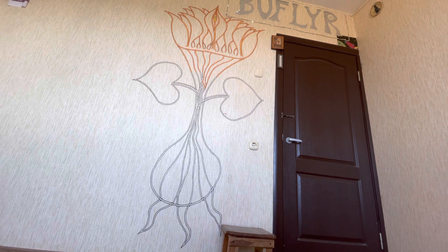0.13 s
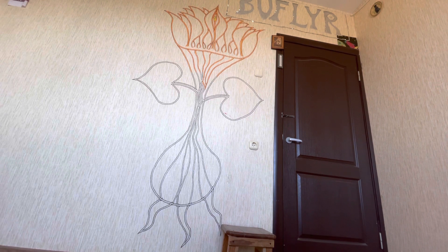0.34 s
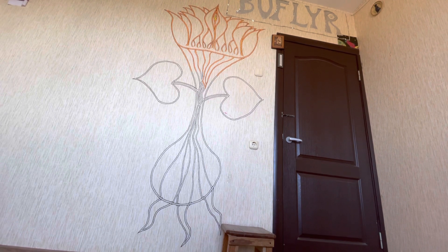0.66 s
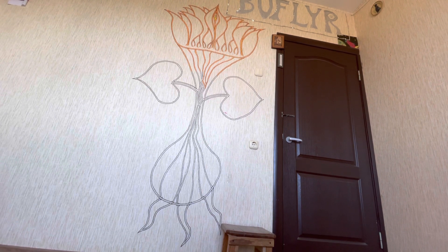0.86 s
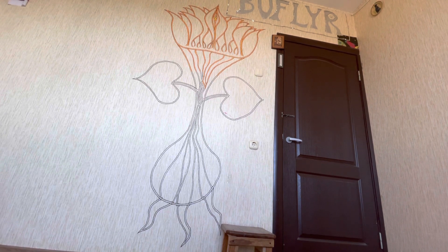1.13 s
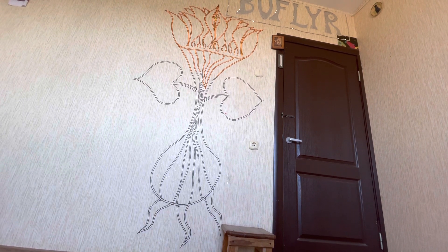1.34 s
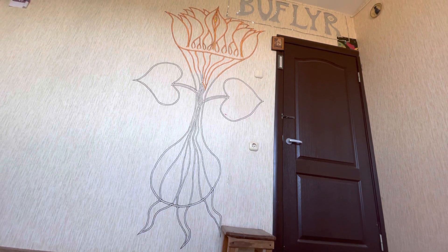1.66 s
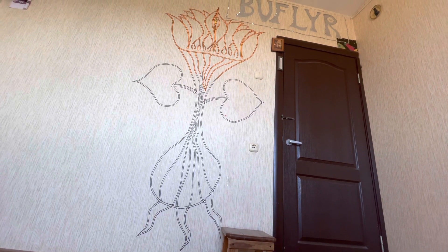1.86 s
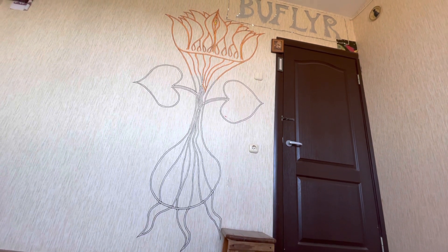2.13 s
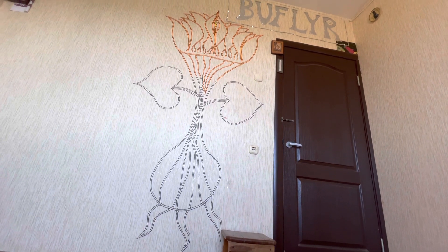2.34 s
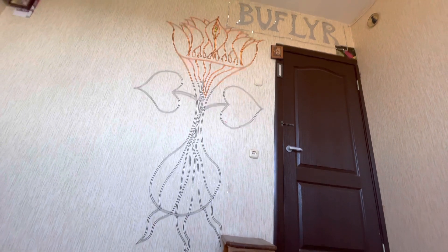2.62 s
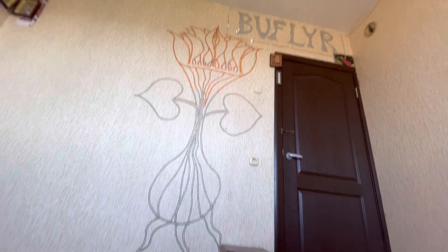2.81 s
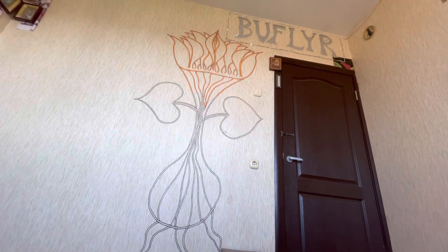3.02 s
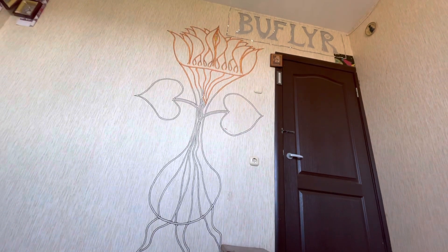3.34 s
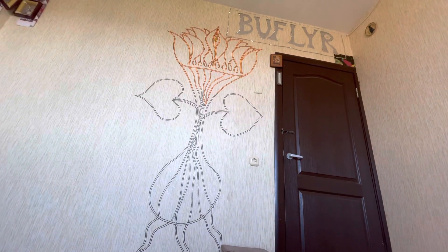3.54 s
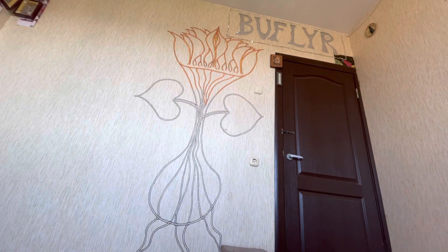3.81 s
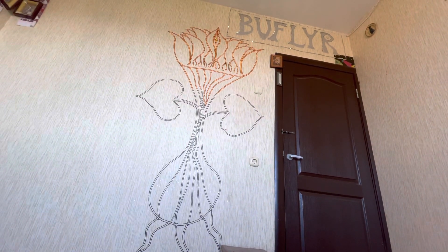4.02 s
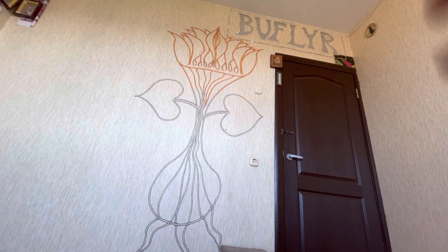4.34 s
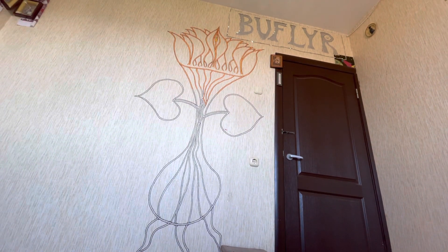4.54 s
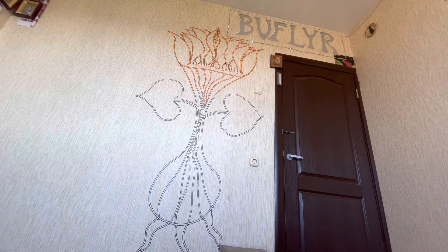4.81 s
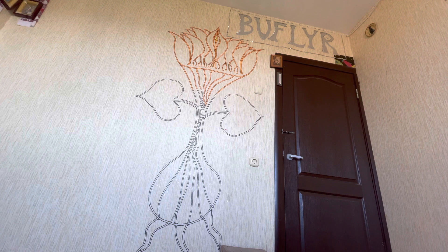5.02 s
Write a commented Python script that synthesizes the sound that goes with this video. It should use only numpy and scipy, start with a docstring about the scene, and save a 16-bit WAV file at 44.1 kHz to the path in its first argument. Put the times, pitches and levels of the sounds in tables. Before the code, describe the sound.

Stereo hand-held camera indoors, with birds heard from outside and echoing off near walls. Faint chirps and pipes open, a loud song of buzz, warble and held whistle fills the middle, then sparse distant chirps and a sinking trill follow. Fingers tick, rub and softly bump the case throughout, over a quiet low hiss.

```python
"""A near bird, outside a small room, sings a thin high buzz, a fast warble and a few clear whistles.
Farther birds add falling chirps, rasps, pipes and a descending trill; many distant chirps blur in echo.
Birds are gliding, fluttering tones with wall echoes and a diffuse tail. The hand-held camera ticks,
squeaks, rustles and rumbles as shaped noise and short tones, over a quiet hush of filtered noise."""
import sys
import numpy as np
from scipy import signal
from scipy.fft import rfft, irfft, next_fast_len
from scipy.io import wavfile
from scipy.ndimage import uniform_filter1d, map_coordinates

SR = 44100
rng = np.random.default_rng(int(sys.argv[2]) if len(sys.argv) > 2 else 0)


def unload_wav(signal):
    """Save mono or channel-first audio to the path in sys.argv[1] as 16-bit WAV at rate SR, clipped to [-1, 1]."""
    wavfile.write(
        sys.argv[1],
        SR,
        np.round(np.clip(np.atleast_2d(signal).T, -1, 1) * 32767).astype(np.int16),
    )


N = 227908


def amp(db):
    """Decibels to gain."""
    return 10 ** (np.asarray(db) / 20)


def unit(x):
    """Scale to rms 1."""
    return x / np.sqrt(np.mean(x ** 2) + 1e-20)


def along(points, hz):
    """Interpolate (Hz, value) points on a log frequency axis."""
    point_hz, values = np.transpose(points)
    return np.interp(np.log(hz + 1), np.log(point_hz + 1), values)


def curve(rows):
    """(s, value) rows as one value per sample."""
    return np.interp(np.arange(N) / SR, *np.transpose(rows))


def wobble(rate_hz, size):
    """A smooth random curve, rate_hz knots a second."""
    knots = rng.standard_normal(int(size * rate_hz / SR) + 4)
    return map_coordinates(knots, [np.arange(size) * rate_hz / SR])


def filtered(x, response):
    """x times a complex response of frequency."""
    m = next_fast_len(N + SR // 2)
    return irfft(rfft(x, m) * response(np.fft.rfftfreq(m, 1 / SR)), m)[..., :N]


def coloured(x, points):
    """x through a causal (minimum-phase) filter with these (Hz, dB) points."""
    m = next_fast_len(N + SR // 2)
    cepstrum = irfft(np.log(amp(along(points, np.fft.rfftfreq(m, 1 / SR)))), m)
    cepstrum *= 1 + np.sign(np.fft.fftfreq(m))  # fold onto positive time
    return filtered(x, lambda hz: np.exp(rfft(cepstrum)))


def add(track, start_s, sound):
    """Mix a sound into a track."""
    part = track[..., max(round(start_s * SR), 0):][..., :sound.shape[-1]]
    part += sound[..., :part.shape[-1]]


def noise(spectrum, side_db):
    """Coloured stereo noise of rms 1; side_db is the side's level against the mid."""
    mid, side = filtered(rng.standard_normal((2, N)), lambda hz: amp(along(spectrum, hz)))
    return unit(np.array([mid + amp(side_db) * side, mid - amp(side_db) * side]))


def patchy(x, depth_db):
    """Noise whose colour shifts in small random time-frequency patches."""
    z = signal.stft(x, nperseg=256)[2]
    field = rng.standard_normal(z.shape[1:])
    field = uniform_filter1d(uniform_filter1d(field, size=5, axis=0), size=7, axis=1)
    return unit(signal.istft(z * amp(depth_db * unit(field)), nperseg=256)[1][:, :N])


def arch(length_s, late, edge):
    """Progress 0-1 through a gesture, and its swell and fall."""
    u = np.linspace(0, 1, max(int(length_s * SR), 8))
    return u, np.abs(np.sin(np.pi * u ** late)) ** edge


def sweep(start_hz, end_hz, bow=0):
    """Start, middle and end pitch of a glide whose middle bows by a share."""
    return start_hz, (start_hz + end_hz) / 2 * (1 + bow), end_hz


BUZZ_RATE_HZ = 165  # mean flutter rate
THROB_HZ = 425  # buzz depth at which the level pulses fully with the flutter


def note(length_s, pitches_hz, buzz_hz, waver, late, edge, uneven=0.45, overtone_db=-50):
    """The syrinx glides through a few pitches; uneven membrane flutter makes the note buzz and throb."""
    u, swell = arch(length_s, late, edge)
    count = len(pitches_hz)
    glide_hz = np.polyval(np.polyfit(np.linspace(0, 1, count), pitches_hz, count - 1), u)
    cycle = 2 * np.pi * np.cumsum(BUZZ_RATE_HZ * (1 + .2 * wobble(90, len(u)))) / SR
    pitch_hz = glide_hz * (1 + waver * wobble(220, len(u)))
    pitch_hz = pitch_hz + buzz_hz * (np.sin(cycle) + uneven * wobble(700, len(u)))
    throb = np.clip(buzz_hz / THROB_HZ, 0, 1)
    phase = 2 * np.pi * np.cumsum(pitch_hz) / SR
    tone = np.sin(phase) + amp(overtone_db) * np.sin(2 * phase)
    return swell * (1 - throb * np.cos(cycle)) * tone


# diffuse tail decay: freq_hz, t60_s
ROOM_DECAY = [(300, 0.53), (3500, 0.43), (8000, 0.31)]


def room(x, early_db, tail_db, early_t60, apart=0.89):
    """Sparse echoes of close walls and a diffuse tail, both from 3 ms on; apart is the stereo difference."""
    hz, t, z = signal.stft(rng.standard_normal((2, SR // 2)), SR, nperseg=256)
    fade = amp(-60 * t / along(ROOM_DECAY, hz)[:, None])
    tail = signal.istft(z * fade, SR, nperseg=256)[1]
    t = np.arange(tail.shape[1]) / SR
    sparse = rng.standard_normal(tail.shape) * (rng.random(tail.shape) < .02)
    early = sparse * amp(-60 * t / early_t60)
    parts = np.array([[1, apart], [1, -apart]]) @ np.array([early, tail]) * (t > .003)
    early, tail = parts / np.linalg.norm(parts, axis=-1, keepdims=True)
    return signal.fftconvolve(x[None], amp(early_db) * early + amp(tail_db) * tail, axes=1)[:, :N]


# near-wall echoes: delay_s, level_db
WALL_ECHOES = [(.0042, -10.5), (.0063, -15), (.0115, -11), (.0172, -12.5), (.0255, -15), (.04, -17)]


def walls(song):
    """Each near wall repeats the song."""
    echoes = np.zeros(N)
    for delay_s, level_db in WALL_ECHOES:
        add(echoes, delay_s, amp(level_db) * song)
    return echoes


# phase between two microphone ports for outside sound: freq_hz, left_lead_rad
PORT_PHASE = [(0, 1.5), (600, -3.5), (1290, -1), (1640, -2), (2330, -4.5), (2670, -5), (3450, -8),
              (4390, -7.5), (4820, -10), (6290, -15), (7060, -12), (7750, -14.5), (8180, -13.5),
              (9470, -21)]


def from_outside(x):
    """The song and its echo reach the two ports out of step."""
    return filtered(x, lambda hz: np.exp(1j * along(PORT_PHASE, hz) * np.array([[.5], [-.5]])))


HAND_LAG_S = 0.000275


def from_hand(x):
    """Sounds of the hand on the case reach the left microphone later."""
    return filtered(x, lambda hz: np.exp(-2j * np.pi * hz * HAND_LAG_S * np.array([[.5], [-.5]])))


# hush spectrum: freq_hz, relative_db
AIR_SPECTRUM = [(30, -11), (90, -5), (160, -8), (230, -6.5), (400, -12), (800, -18), (1350, -18),
                (1800, -24.5), (3500, -28), (5000, -28.5), (9200, -28), (10500, -40), (15000, -51)]
AIR_DB = -74


def background():
    """The steady hush of the room: filtered noise."""
    return amp(AIR_DB) * noise(AIR_SPECTRUM, side_db=1.5)


# slow hand slides: start_s, length_s, drag_db, body_db, bright_db
SLIDES = [(0, 0.24, -105, -94, -65), (0.509, 0.64, -70.5, -66, -68.5), (4.087, 0.416, -78, -83, -100)]
# drag, hiss and (shared with rubs) bright friction spectra: freq_hz, relative_db
DRAG_SPECTRUM = [(40, -36), (170, -21), (290, 0.5), (430, 3), (560, -12.5), (850, -21), (1200, -31),
                 (3000, -83)]
HISS_SPECTRUM = [(600, -23), (1050, -4), (1350, 9.5), (1680, -5), (2050, 8), (2600, -9.5), (4000, -23.5),
                 (9000, -42), (10500, -74)]
BRIGHT_SPECTRUM = [(900, -22.5), (1400, -4), (2200, 9.5), (3500, 0), (4800, 10), (5500, 4.5), (6200, 8),
                   (7600, -11.5), (9000, 5.5), (10000, -10.5), (10800, -30), (14500, -21)]
PATCHY_DB = 3.5  # unevenness of shifting colour


def slides(grain_db=3.0, lump_db=3.0):
    """The hand slides over the case: a grainy hiss swells and fades over a low, lumpy drag."""
    low, body, bright = np.zeros((3, N))
    for start_s, length_s, drag_db, body_db, bright_db in SLIDES:
        speed = arch(length_s, late=0.82, edge=1.0)[1]
        add(low, start_s, amp(drag_db) * speed ** 0.23)
        add(body, start_s, amp(body_db) * speed)
        add(bright, start_s, amp(bright_db) * speed)
    drag = low * amp(lump_db * wobble(30.06, N)) * noise(DRAG_SPECTRUM, side_db=-0.5)
    hiss = body * noise(HISS_SPECTRUM, side_db=-7)
    hiss = hiss + bright * patchy(noise(BRIGHT_SPECTRUM, side_db=-6), PATCHY_DB)
    return from_hand(drag + amp(grain_db * wobble(200, N)) * hiss)


# rustles, as of fingers and sleeve on the case: start_s, length_s, dull_db, bright_db
RUBS = [(1.508, 0.069, -65.5, -75), (1.743, 0.11, -70, -69), (1.872, 0.14, -63, -65),
        (2.602, 0.23, -75.5, -79), (2.757, 0.075, -67.5, -70.5), (2.888, 0.054, -70, -80),
        (3.685, 0.1, -65, -67.5), (4.921, 0.22, -85, -73.5)]
# dull rub spectrum: freq_hz, relative_db
DULL_SPECTRUM = [(70, -29), (130, -7), (220, -0.5), (380, 0.5), (700, -6.5), (1300, -1), (2400, -21.5),
                 (4000, -57)]
# handling rumble: time_s, level_db
RUMBLE_LEVEL = [(0.0, -70.5), (0.47, -74.5), (1.89, -64), (2.81, -68.5), (3.09, -64), (3.48, -72.5),
                (3.99, -71), (4.23, -79), (5.17, -75.5)]
# rumble spectrum: freq_hz, relative_db
RUMBLE_SPECTRUM = [(22, -29), (45, 2.5), (90, 2.5), (110, 4), (135, -9.5), (165, 0.5), (205, -31.5),
                   (400, -51.5)]
# soft knocks through the hand: start_s, pitch_hz, level_db (before attack and channel gains)
BUMPS = [(0.659, 70.2, -50), (2.922, 88.4, -44.5)]


def handling(grain_db=2.5, lump_db=3, bump_t60=0.29):
    """The holding hand: grainy friction noise, lumpy low rumble and soft decaying sine bumps."""
    dull, bright, bumps = np.zeros((3, N))
    for start_s, length_s, dull_db, bright_db in RUBS:
        stroke = arch(length_s, late=1.0, edge=0.44)[1]
        add(dull, start_s, amp(dull_db) * stroke)
        add(bright, start_s, amp(bright_db) * stroke)
    grain = amp(grain_db * wobble(250, N))
    dull_rubs = dull * patchy(noise(DULL_SPECTRUM, side_db=2), PATCHY_DB)
    bright_rubs = bright * patchy(noise(BRIGHT_SPECTRUM, side_db=-5.5), PATCHY_DB)
    rubs = grain * (dull_rubs + bright_rubs)
    t = np.arange(SR // 2) / SR
    for start_s, pitch_hz, level_db in BUMPS:
        decay = amp(level_db - 60 * t / bump_t60) * (1 - np.exp(-t / 0.0031))
        add(bumps, start_s, decay * np.sin(2 * np.pi * pitch_hz * t))
    lumps = unit(amp(lump_db * wobble(18, N)) * noise(RUMBLE_SPECTRUM, side_db=-6))
    rumble = amp(curve(RUMBLE_LEVEL)) * lumps * amp([[1.5], [-1.5]])
    return from_hand(rubs) + rumble + bumps * amp([[3], [-6]]) * [[1], [-1]]  # bumps: opposite polarity


# distant birds' level: time_s, level_db
CHORUS_LEVEL = [(0, -58), (.3, -67.5), (.68, -68.5), (.88, -57.5), (1.2, -81), (2.7, -73.5), (4.3, -94),
                (5.17, -77.5)]


def chorus(count=300, pitch_hz=3200, spread=0.15, fall=.08):
    """Many distant birds chirp at random; only their echo is heard."""
    song = np.zeros(N)
    for i, (when, high, slope, long) in enumerate(rng.standard_normal((count, 4))):
        hz = pitch_hz * np.exp(spread * high)
        step = np.exp(fall * (1 + slope) / 2)
        length_s = 0.027 * np.exp(0.35 * long)
        chirp = note(length_s, (hz * step, hz, hz / step), buzz_hz=140, waver=0.015, late=0.067, edge=0.92)
        add(song, (i + when / 2) / count * N / SR, chirp)
    echo = room(song, early_db=-4.0, tail_db=0.5, early_t60=0.19, apart=0.2)
    return amp(curve(CHORUS_LEVEL)) * unit(from_outside(echo))


# far slides and level pipes: start_s, length_s, start_hz, end_hz, level_db
PIPES = [(0.024, 0.023, 2660, 2290, -57.5), (0.099, 0.03, 3490, 2932, -46.5),
         (0.257, 0.11, 2340, 2725, -57), (0.386, 0.09, 3076, 3127, -61), (0.594, 0.055, 3376, 3335, -54),
         (0.711, 0.091, 2995, 3027, -52.5), (0.944, 0.11, 2858, 2680, -54),
         (1.109, 0.071, 2770, 2903, -61.5), (1.524, .04, 4310, 3940, -60.5),
         (2.64, 0.51, 8240, 8270, -78.5), (2.767, 0.05, 2935, 2976, -60), (3.091, 0.02, 2676, 2330, -65),
         (3.739, 0.035, 4592, 4410, -56.5)]
FAR_EDGE = .5  # softness of far notes' ends, also in far_birds


def piping_birds(direct_db=-4):
    """Slides and level pipes from farther still: lightly buzzing tones, mostly echo."""
    song = np.zeros(N)
    for start_s, length_s, start_hz, end_hz, level_db in PIPES:
        pipe = note(length_s, sweep(start_hz, end_hz), buzz_hz=54.6, waver=0.012, late=0.92, edge=FAR_EDGE)
        add(song, start_s, amp(level_db) * pipe)
    echo = room(song, early_db=-0.5, tail_db=-3.0, early_t60=0.16, apart=0.38)
    return from_outside(amp(direct_db) * song + echo)


# falling slurs: start_s, length_s, start_hz, end_hz, level_db
SLURS = [(0.05, 0.038, 3940, 3250, -51.5), (0.552, 0.035, 3650, 3300, -50.5),
         (0.734, 0.059, 3754, 3375, -49), (0.838, 0.029, 5000, 3496, -50.5),
         (0.884, 0.049, 3617, 3177, -51.5), (0.942, 0.021, 4900, 3250, -49),
         (3.298, 0.009, 5140, 3170, -55.5), (3.434, 0.05, 4090, 3377, -57.5),
         (3.78, 0.018, 4100, 3310, -60), (4.008, 0.021, 4560, 3230, -58), (4.232, .022, 4410, 4260, -65),
         (4.249, .03, 4050, 3290, -60), (4.499, .014, 5610, 4470, -63.5), (4.508, 0.025, 3910, 3340, -56.5),
         (4.755, 0.03, 4050, 3300, -59.5), (4.973, 0.025, 3830, 3365, -56.5),
         (4.992, 0.036, 3680, 3130, -57.5)]
SLUR_BOW = 0.0026
# rising calls: start_s, length_s, end_hz, level_db
RISES = [(2.969, 0.029, 3480, -62.5), (3.13, 0.017, 4006, -57.5), (3.145, 0.014, 4864, -64),
         (3.282, .015, 5250, -59)]
RISE_START_HZ, RISE_BOW = 3090, -0.018
# trill that slows, sinks and mostly grows louder: start_s, start_hz, level_db
TRILL = [(3.429, 7750, -65.5), (3.499, 7600, -65), (3.575, 7170, -60), (3.66, 6700, -55),
         (3.752, 6300, -56.5), (3.854, 5650, -54), (3.978, 5790, -53.5)]
TRILL_END_HZ, TRILL_NOTE_S, TRILL_BOW = 4590, .04, 0.045
# high lisps leading into late slurs: start_s, length_s, end_hz, level_db
LISPS = [(3.968, 0.014, 5370, -59), (4.218, 0.015, 4440, -68), (4.469, .019, 5520, -67),
         (4.96, 0.015, 3970, -67)]
LISP_START_HZ, LISP_BOW = 7080, -0.03


def far_notes():
    """Farther birds' calls: start_s, length_s, pitches_hz, level_db."""
    for start_s, length_s, start_hz, end_hz, level_db in SLURS:
        yield start_s, length_s, sweep(start_hz, end_hz, SLUR_BOW), level_db
    for start_s, length_s, end_hz, level_db in RISES:
        yield start_s, length_s, sweep(RISE_START_HZ, end_hz, RISE_BOW), level_db
    for start_s, start_hz, level_db in TRILL:
        yield start_s, TRILL_NOTE_S, sweep(start_hz, TRILL_END_HZ, TRILL_BOW), level_db
    for start_s, length_s, end_hz, level_db in LISPS:
        yield start_s, length_s, sweep(LISP_START_HZ, end_hz, LISP_BOW), level_db


# far rasping notes: start_s, length_s, start_hz, end_hz, level_db
RASPS = [(.135, 0.091, 3130, 2993, -56.5), (.655, 0.066, 3400, 3360, -65),
         (3.984, 0.024, 6330, 5900, -62.5), (4.485, 0.027, 5450, 5670, -63.5),
         (4.49, 0.063, 6150, 5700, -69), (4.54, 0.12, 3546, 3515, -69.5), (4.69, 0.095, 4540, 4290, -72),
         (4.69, 0.033, 3530, 3346, -65)]
RASP_DEPTH_HZ = 171  # flutter depth


def far_birds(walls_db=-2):
    """Gliding, slightly hoarse chirps and rasps, doubled by the walls and smeared by echo."""
    song = np.zeros(N)
    for start_s, length_s, pitches_hz, level_db in far_notes():
        hoarse_hz = 15 + 0.045 * np.ptp(pitches_hz)  # wide sweeps are the hoarsest
        chirp = note(length_s, pitches_hz, hoarse_hz, waver=0.0065, late=1.93, edge=FAR_EDGE, overtone_db=-38)
        add(song, start_s, amp(level_db) * chirp)
    for start_s, length_s, start_hz, end_hz, level_db in RASPS:
        rasp = note(length_s, sweep(start_hz, end_hz), RASP_DEPTH_HZ, waver=.02, late=0.84, edge=FAR_EDGE)
        add(song, start_s, amp(level_db) * rasp)
    echo = room(song, early_db=-2.0, tail_db=-4.5, early_t60=0.14, apart=1.0)
    return from_outside(song + amp(walls_db) * walls(song) + echo)


# sharp clicks of the case: start_s, snap_db, thud_db
CLICKS = [(.149, -51, -80), (.361, -38, -70), (1.035, -44.5, -57.5), (1.3963, -43.5, -63.5),
          (1.5372, -58, -45), (1.6145, -56.5, -47.5), (1.769, -51.5, -60.5), (1.902, -54.5, -59),
          (1.956, -46, -43.5), (3.8835, -48, -91)]
# hand taps that ring the case: start_s, ring_db
TAPS = [(0.335, -46.5), (0.381, -54.5), (0.443, -47.5), (1.031, -50), (1.496, -46), (1.765, -48.5),
        (1.863, -50), (1.9815, -42.5), (2.043, -48.5), (2.62, -52.5), (2.913, -49.5), (4.3991, -58),
        (4.536, -48), (4.9507, -51)]
TAP_THUD_DB, TAP_SNAP_DB = -21.5, -17.5  # relative to the ring
# case resonances: freq_hz, width_hz, relative_db
CASE_MODES = [(1414, 73, 0.5), (2240, 450, -7), (3320, 430, -8)]
# thud and snap spectra: freq_hz, relative_db
THUD_SPECTRUM = [(40, -14), (130, 17.5), (400, 9), (1000, -1.5), (2500, -56.5)]
SNAP_SPECTRUM = [(1500, -33), (3300, 7.5), (4600, -6.5), (6200, 9.5), (7800, 2.5), (9300, 8.5),
                 (10500, -41), (15000, -47)]


def case_response(hz):
    """Sum of the case's band-pass resonances."""
    total = 0
    for freq_hz, width_hz, level_db in CASE_MODES:
        damping = 1j * hz * width_hz
        total = total + amp(level_db) * damping / (freq_hz * freq_hz - hz * hz + damping)
    return total


def ticks(ring_t60=0.045, thud_t60=0.03, snap_t60=0.0087):
    """Noise bursts: taps ring the case with a dull thud and sharp snap; clicks only thud and snap."""
    ring, thud, snap = np.zeros((3, N))
    t = np.arange(SR // 8) / SR
    soft_rise = 1 - np.exp(-t / .002)
    sharp_rise = 1 - np.exp(-t / .0004)
    for start_s, ring_db in TAPS:
        add(ring, start_s, soft_rise * amp(ring_db - 60 * t / ring_t60))
    tap_clicks = [(start_s, db + TAP_SNAP_DB, db + TAP_THUD_DB) for start_s, db in TAPS]
    for start_s, snap_db, thud_db in list(CLICKS) + tap_clicks:
        add(thud, start_s, sharp_rise * amp(thud_db - 60 * t / thud_t60))
        add(snap, start_s, sharp_rise * amp(snap_db - 60 * t / snap_t60))
    strike = noise([(700, -19.5), (1300, 6.5), (3000, 5.0), (4500, -17.5)], side_db=-7.5)
    body = unit(filtered(strike, case_response))
    dry = ring * body
    dry = dry + thud * noise(THUD_SPECTRUM, side_db=6.5) + snap * noise(SNAP_SPECTRUM, side_db=3.5)
    return from_hand(dry + room(dry[0], early_db=-13.5, tail_db=-11.0, early_t60=0.22))


# thin high buzz: start_s, length_s, pitch_hz, level_db, buzz_hz
BUZZES = [(1.034, 0.056, 8280, -47, 117), (1.095, 0.037, 8316, -45, 170), (1.127, 0.023, 7930, -45, 25.9),
          (1.199, 0.024, 5810, -57.5, 603), (1.21, 0.058, 7994, -38, 220), (1.26, 0.052, 7590, -42, 22),
          (1.2945, 0.043, 7940, -36, 323), (1.339, 0.031, 7940, -39, 161),
          (1.364, 0.034, 8000, -35.5, 105.4), (1.416, 0.081, 7976, -44, 180)]
BUZZ_SAG = 0.016  # share by which a buzz starts above and ends below its pitch
# quick flicks in and around the warble: start_s, length_s, start_hz, end_hz, level_db
FLICKS = [(1.568, 0.014, 4900, 4400, -44), (1.608, 0.024, 3520, 3520, -33.5),
          (1.643, 0.02, 4450, 4250, -41), (1.647, .018, 3600, 3300, -43.5), (1.7, 0.021, 4500, 4420, -34.5),
          (1.773, 0.01, 4450, 4250, -35), (1.82, .015, 3720, 3780, -33), (1.84, 0.008, 3250, 3050, -33),
          (1.948, .013, 3480, 3530, -37.5), (2.019, 0.008, 3750, 3350, -37.5),
          (2.026, .012, 4250, 4400, -39.5), (2.088, .008, 3110, 4164, -39.5),
          (2.099, .009, 4140, 4950, -42), (2.168, 0.0095, 3660, 5020, -34)]
FLICK_BUZZ_HZ = 95  # flutter depth
# warble syllables: up_start_s, up_length_s, up_pitch_hz, up_level_db, buzz_hz,
# down_start_s, down_length_s, down_start_hz, down_end_hz, down_level_db
WARBLE = [(1.58, .024, 4328, -33, 240.4, 1.597, 0.022, 4415, 3450, -37.5),
          (1.685, .026, 4186, -31, 130.5, 1.713, 0.012, 4814, 3334, -33.5),
          (1.742, 0.021, 3913, -31.5, 50, 1.761, 0.018, 4600, 3480, -28.5),
          (1.804, 0.02, 3795, -31, 60, 1.829, .019, 4533, 3050, -32),
          (1.87, 0.02, 3790, -32, 60.6, 1.891, .016, 5044, 2800, -31),
          (1.943, 0.021, 4340, -38.5, 150, 1.957, 0.015, 3768, 3167, -38.5)]
# upstroke hook: pitch_share
UPSTROKE = (0.68, 0.92, 0.99, 0.95, 0.98)
DOWNSTROKE_BOW = -.04  # steepest at first
# other side of the syrinx joins the warble: start_s
SECOND_VOICE_AT = [1.816, 1.878]
SECOND_VOICE_HZ, SECOND_VOICE_DB, SECOND_VOICE_S = 4960, -44, 0.024
# clear closing whistles: start_s, length_s, start_hz, end_hz, level_db
WHISTLES = [(2.239, 0.022, 4544, 4370, -37.5), (2.256, 0.025, 4394, 4258, -30.5),
            (2.409, 0.057, 5065, 4760, -55), (2.461, 0.04, 3775, 3700, -41.5),
            (2.51, 0.05, 4170, 4250, -48.5), (2.536, 0.027, 4310, 4240, -46)]
WHISTLE_BUZZ_HZ = 8.3  # flutter depth


def near_notes():
    """Near bird's song: start_s, length_s, pitches_hz, level_db, buzz_hz."""
    for start_s, length_s, hz, level_db, buzz_hz in BUZZES:
        yield start_s, length_s, sweep(hz * (1 + BUZZ_SAG), hz * (1 - BUZZ_SAG)), level_db, buzz_hz
    for start_s, length_s, start_hz, end_hz, level_db in FLICKS:
        yield start_s, length_s, sweep(start_hz, end_hz), level_db, FLICK_BUZZ_HZ
    for up_s, up_length_s, hz, up_db, buzz_hz, down_s, down_length_s, start_hz, end_hz, down_db in WARBLE:
        yield up_s, up_length_s, hz * np.array(UPSTROKE), up_db, buzz_hz
        yield down_s, down_length_s, sweep(start_hz, end_hz, DOWNSTROKE_BOW), down_db, buzz_hz
    for start_s in SECOND_VOICE_AT:
        pitches_hz = sweep(SECOND_VOICE_HZ, SECOND_VOICE_HZ)
        yield start_s, SECOND_VOICE_S, pitches_hz, SECOND_VOICE_DB, FLICK_BUZZ_HZ
    for start_s, length_s, start_hz, end_hz, level_db in WHISTLES:
        yield start_s, length_s, sweep(start_hz, end_hz), level_db, WHISTLE_BUZZ_HZ


# full, held tones: start_s, length_s, level_db, edge_softness, pitches_hz
HELD = [(2.148, .017, -29.5, 0.6, (3210, 3650, 3724, 3790, 3900)),
        (2.315, .112, -25, .7, (3567, 3623, 3529, 3562, 3690))]
# colour of the way into the room: freq_hz, gain_db
PATH = [(3200, -2), (3520, 0), (3800, -1), (4020, -9), (4150, -3.5), (4330, 0), (4750, -3.5), (5080, 2),
        (7300, -5), (8000, -0.5), (10200, 0.5), (11500, -16)]


def near_bird():
    """Fluttering syrinx tones (buzz, warble, whistles), coloured and repeated by the room."""
    song = np.zeros(N)
    for start_s, length_s, pitches_hz, level_db, buzz_hz in near_notes():
        edge = 0.87 / (1 + abs(buzz_hz) / 400)  # clear notes swell, buzzy ones start more abruptly
        tone = note(length_s, pitches_hz, buzz_hz, waver=0.0033, late=0.97, edge=edge, overtone_db=-43.5)
        add(song, start_s, amp(level_db) * tone)
    for start_s, length_s, level_db, edge, pitches_hz in HELD:
        tone = note(length_s, pitches_hz, WHISTLE_BUZZ_HZ, waver=0.002, late=1.12, edge=edge)
        add(song, start_s, amp(level_db) * tone)
    song = coloured(song, PATH)
    echo = room(song, early_db=-7.5, tail_db=-10.0, early_t60=0.03, apart=0.47)
    return from_outside(song + walls(song) + echo)


# pips of the case under the fingers: start_s, length_s, pitch_hz, level_db
SQUEAKS = [(1.035, 0.0038, 3390, -39.5), (1.4952, 0.0039, 2760, -34.5), (1.508, 0.0075, 1440, -44),
           (1.979, 0.032, 2305, -49.5), (4.542, 0.011, 2620, -61)]


def squeaks():
    """The case gives a few very short, wavering pips under the fingers."""
    track = np.zeros(N)
    for start_s, length_s, pitch_hz, level_db in SQUEAKS:
        pip = note(length_s, sweep(pitch_hz, pitch_hz), 0, waver=0.019, late=0.77, edge=2.2)
        add(track, start_s, amp(level_db) * pip)
    return from_hand(track)


def scene():
    """Birds outside, the hand and the room's quiet."""
    quiet = background()
    hand = slides() + handling()
    birds = chorus() + piping_birds() + far_birds()
    hand = hand + ticks()
    birds = birds + near_bird()
    return quiet + birds + hand + squeaks()


TOP_HZ = 15200


def record(dry):
    """The camera keeps nothing above its band limit."""
    return filtered(dry, lambda hz: hz < TOP_HZ)


dry = scene()
out = record(dry)
unload_wav(out)
```